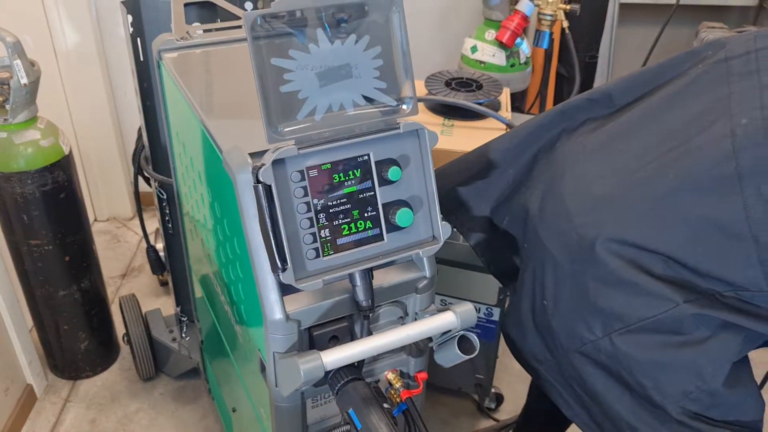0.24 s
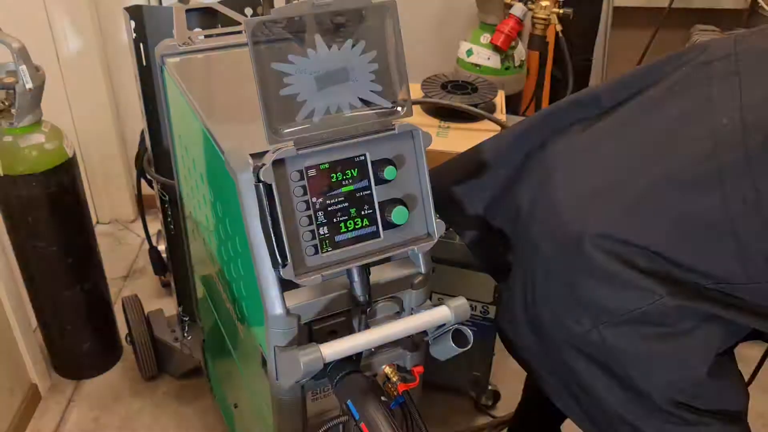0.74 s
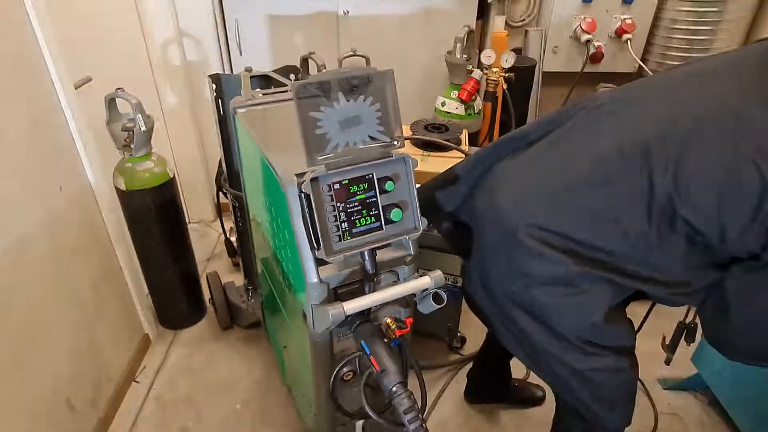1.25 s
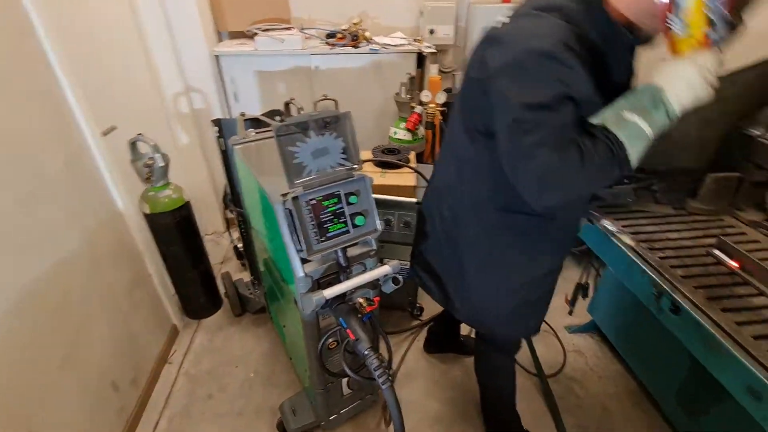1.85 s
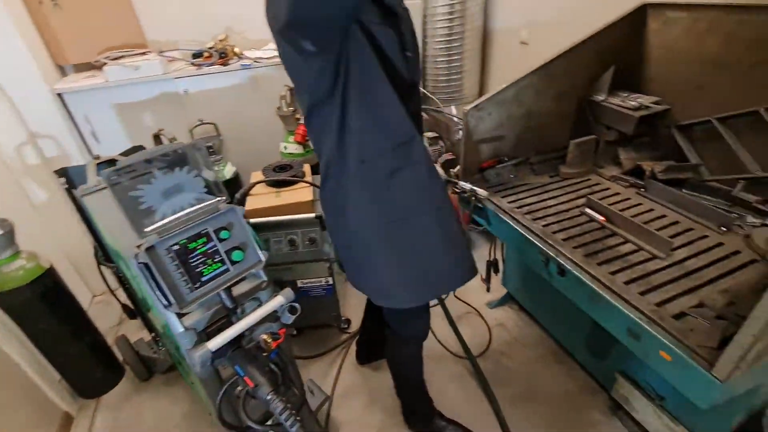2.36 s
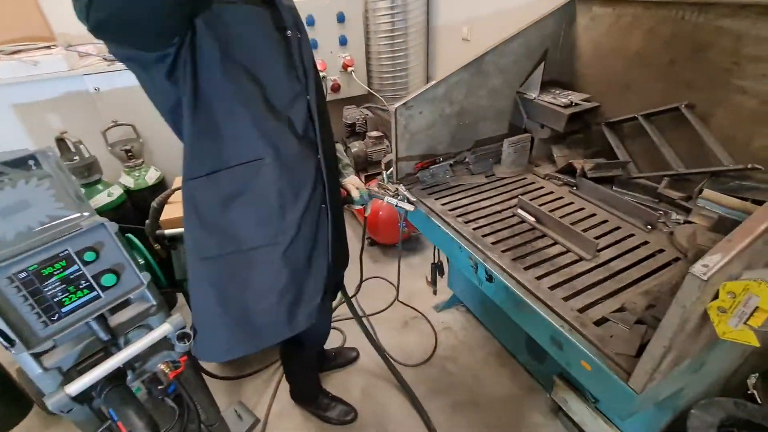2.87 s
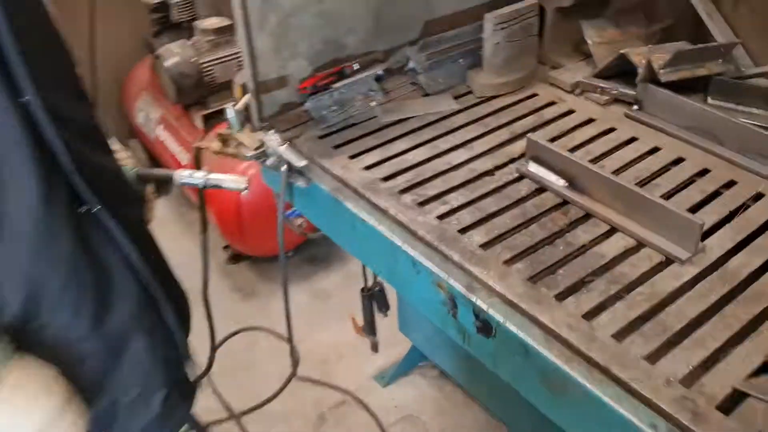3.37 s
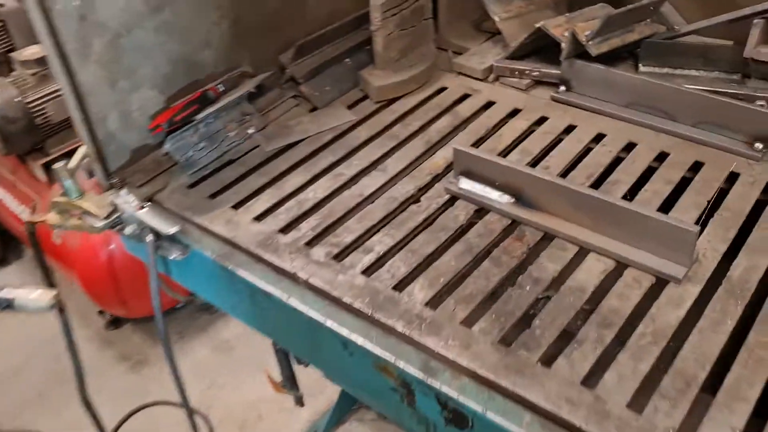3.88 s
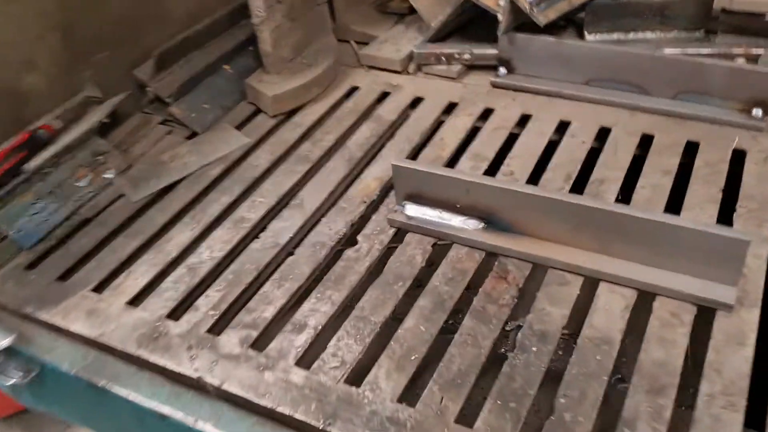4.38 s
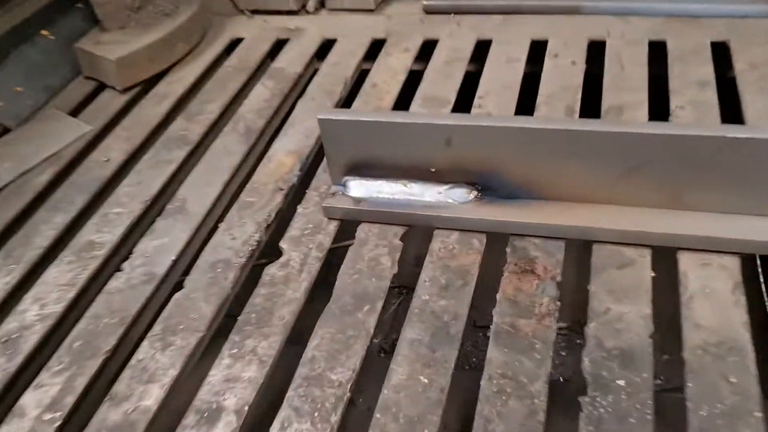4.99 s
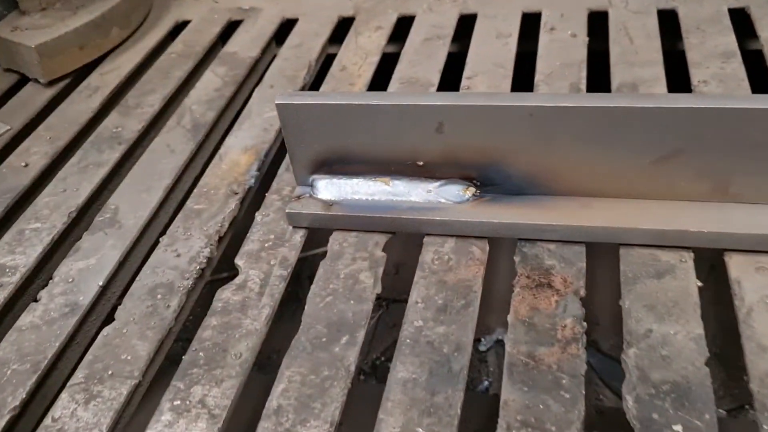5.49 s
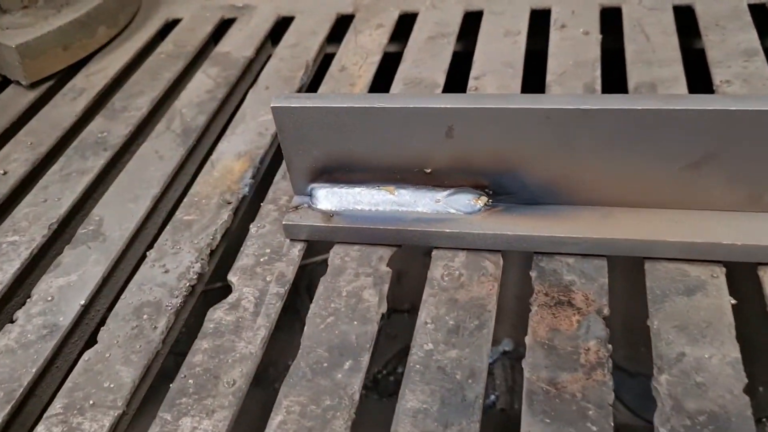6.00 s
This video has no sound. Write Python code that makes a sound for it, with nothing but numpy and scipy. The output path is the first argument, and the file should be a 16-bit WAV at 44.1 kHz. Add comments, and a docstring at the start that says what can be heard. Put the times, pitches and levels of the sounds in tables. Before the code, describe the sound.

Steady pitched welding buzz steps down and stops at once; shielding gas hisses on, then shuts off, over a faint pump whine and fan hum.

```python
"""Pulsed welding arc going out

A welding arc buzzes and sizzles in a workshop near a hand-held stereo microphone: current pulses make
pressure steps that slow down in stages and stop. Shielding gas hisses as jet noise until its valve shuts.
A cooling pump whines as modulated gear tones; fans and a low drone are shaped noise, small knocks are
resonant noise bursts, and cloth rustles in grainy noise strokes.
"""
import sys
import numpy as np
from scipy import signal
from scipy.fft import rfft, irfft, next_fast_len
from scipy.io import wavfile
from scipy.ndimage import uniform_filter1d, map_coordinates

SR = 44100
rng = np.random.default_rng(int(sys.argv[2]) if len(sys.argv) > 2 else 0)


def to_wav(sig):
    """Store sig (one row per channel, or 1-D mono) as 16-bit WAV at the path in sys.argv[1].

    Samples outside -1..1 are clipped; the rate is SR.
    """
    pcm = np.clip(np.atleast_2d(sig), -1, 1) * 32767
    pcm = np.round(pcm).astype(np.int16)
    wavfile.write(sys.argv[1], SR, pcm.T)  # frames by channels


N = 275184

# All levels in the tables are relative unless called a peak.
# strength of the current pulses: (time [s], level [dB])
ARC_PULSE_LEVEL = [(0, -0.5), (.42, -.5), (.48, 1), (.55, -1), (.67, -.5), (.7, -2)]
# pulse rate of the power source, lowered in steps: (start time [s], rate [pulses/s])
PULSE_RATE_STEPS = [(0, 244.85), (.456, 241), (.5155, 228.5), (.570, 179.5), (.623, 148.6), (.6665, 119.6)]
# the arc's way past bench and welder to each port: (frequency [Hz], left level [dB], right level [dB])
ARC_PATH = [(117, -29.5, -30), (151, -35.5, -31), (187, -43, -42), (225, -28, -28.5), (250, -28.5, -31.5),
            (306, -33, -29), (348, -31.5, -33.5), (452.8, -26, -24), (460.6, -42.5, -34.5), (620, -32, -35),
            (750, -37.5, -37.5), (892, -27.5, -22.5), (973, -22.5, -23.5), (1055, -17.5, -14.5),
            (1130, -44, -45), (1186, -15, -37), (1232, -41.5, -50), (1320, -42, -16.5), (1453, -19, -28),
            (1596, -47, -15.5), (1731, -18.5, -12), (1814, -28, -16), (2010, -46, -40),
            (2184, -30.5, -28.5), (2400, -38, -31), (2520, -33.5, -28.5), (2693, -41, -31),
            (2938, -40.5, -29.5), (3110, -24, -29), (3188, -57, -28), (3230, -30, -26.5),
            (3406, -35, -24.5), (3820, -40, -49), (3970, -29.5, -30), (4094, -22, -34), (4300, -61, -47),
            (4610, -31, -25.5), (4830, -27.5, -43), (5350, -50, -29.5), (5387, -28, -32), (5410, -39, -42),
            (6200, -38, -37.5), (6600, -40, -35), (7300, -45.5, -43.5), (8370, -32, -41), (9700, -50, -36),
            (11400, -48, -37.5), (13000, -45, -38), (15500, -50, -46)]
# left-port phase against the right for the arc, negative is late: (frequency [Hz], phase [rad])
LEFT_PHASE = [(0, 0), (690, -2), (1810, -3.5), (2670, -6), (3620, -8), (3880, -8.5), (4740, -10),
              (6370, -15.5), (7320, -11.5), (7840, -18.5), (8350, -11), (8610, -13.5), (10800, -17),
              (15700, -27.5)]
# spectrum of the plasma's sizzle: (frequency [Hz], left level [dB], right level [dB])
SIZZLE_SPECTRUM = [(100, -26, -24), (300, -42, -14), (706, -7, -27), (1240, -11, 2), (1620, -12, 6.5),
                   (2450, -2.5, -5.5), (4640, -6.5, -5), (6160, -10, -5), (7500, -14, -10.5),
                   (8600, -3, -2.5), (10100, -9, -1), (11600, -2.5, 4.5), (13400, -5.5, 2.5),
                   (15800, -8, -13)]
# spits of metal, before the path to the ports: (time [s], starting level [dB])
SPITS = [(0.2064, -10), (0.486, -10.5), (0.5104, -12.5), (0.5731, -23), (0.5844, -12.5), (0.607, -17),
         (0.6445, -16), (0.681, -8), (0.6976, -21)]
# gas flow: (time [s], hiss level [dB], how far the nozzle is clear of the work [0-1])
GAS_FLOW = [(0.85, -49.5, 0), (1.25, -50.5, 0), (1.65, -46, 0.4), (2.6, -42, 0.64), (3, -43.5, 0.49),
            (3.3, -42, 0.76), (4.3, -39.5, 0.71)]
# jet blowing on the work, behind the welder: (frequency [Hz], spectral density [dB/Hz])
SHADED_JET = [(590, -46), (1000, -45), (1180, -6), (1430, -8.5), (1960, 2), (2070, -6.5), (3300, -14.5),
              (4010, -22), (5820, -8.5), (14700, -18), (15900, -18)]
# jet blowing free: (frequency [Hz], spectral density [dB/Hz])
FREE_JET = [(590, -64), (1000, -39), (1050, -28), (1520, -13), (1830, -4), (2150, -12), (2650, -17),
            (3150, -13), (4610, -21), (6020, -10.5), (9140, -6.5), (11800, -17.5), (14900, -16.5),
            (15900, -19)]
# low drone: (frequency [Hz], spectral density [dB/Hz])
DRONE_SPECTRUM = [(12, -46), (20, -17.5), (67, -3), (86, 6), (104, 2), (124, -14.5), (178, -8.5),
                  (200, -22.5), (260, -64), (440, -120)]
# drone over time: (time [s], level [dB])
DRONE_COURSE = [(.85, -48), (3, -45.5), (3.9, -42.5), (4.2, -43.5), (5.4, -37.5), (5.72, -40),
                (5.83, -34.5), (6.03, -39.5), (6.18, -34.5), (6.24, -38)]
# fan noise: (frequency [Hz], spectral density [dB/Hz])
FAN_SPECTRUM = [(70, -37), (120, -6), (150, -12), (400, -11.5), (900, -17), (1700, -16.5), (2200, -23.5),
                (3300, -26), (4000, -30.5), (5000, -38.5), (7000, -37), (11500, -35.5), (16000, -37)]
# left-right likeness of the fan noise: (frequency [Hz], correlation [0-1])
FAN_LIKENESS = [(60, 0.79), (240, 1), (950, 0.54), (3770, 0.073), (15000, 0.02)]
# narrow hums among the fans: (frequency [Hz], level over the broad fan noise [dB], width [Hz])
FAN_HUMS = [(300.8, -13.5, 3), (395, -7, 47), (1208, -13, 20)]
# fans over time: (time [s], level [dB])
FAN_COURSE = [(.85, -46.5), (1.9, -44.5), (2.5, -43), (3.1, -46.5), (6.24, -45)]
# pump whine: (time [s], tooth tone level [dB], side tone level [dB])
WHINE_COURSE = [(.85, -62, -59.5), (1.7, -57.5, -60), (2.05, -46.5, -52.5), (2.5, -59, -57),
                (3.25, -55, -59), (3.5, -45, -74), (4.3, -49, -64), (5.1, -49, -63.5), (6.24, -50.5, -62.5)]
# overtones of the tooth tone: (multiple [1], level [dB])
TOOTH_OVERTONES = [(2, -12), (3, -13.5), (4, -15.5), (5, -17.5), (6, -13), (7, -45.5)]
# knocks: (time [s], body peak level [dB], body frequency [Hz], bright tick peak level [dB])
KNOCK_LIST = [(1.885, -31, 560, -50), (2.02, -33, 2300, -35), (2.317, -28.5, 1420, -50),
              (2.4, -35, 1520, -50), (2.44, -34, 590, -50), (2.655, -33, 1300, -43),
              (4.56, -44.5, 3300, -60), (5.337, -38, 2900, -42.5), (5.404, -41, 3380, -44),
              (5.885, -42, 2900, -57)]
# cloth strokes: (middle time [s], level [dB], length [s])
RUSTLE_STROKES = [(5.004, -63, .25), (5.3, -57.5, 0.37), (5.68, -54, 0.21), (5.896, -55.5, .14)]
# cloth noise: (frequency [Hz], spectral density [dB/Hz])
CLOTH_SPECTRUM = [(800, -20), (2000, -15), (3200, 0), (5000, -9.5), (9000, -12), (16000, -22)]
# reverberation of the workshop: (frequency [Hz], time to fall 60 dB [s])
ROOM_T60 = [(150, 0.9), (1000, 0.29), (3000, 0.31), (12000, 0.11)]

ARC_OUT, GAS_SHUT = .701, 4.328  # s
BURNT = SR // 5  # samples for which the arc has already been burning at the start
SIZZLE_DB, SIZZLE_FALL_DB = -17.5, 10.5  # at the full pulse rate; lost if the rate fell to nothing
SCATTER, SCATTER_GROWS = 0.2, 1.7  # timing scatter [samples] at the full rate; added if it fell to nothing
TOOTH_HZ, SHAFT_HZ = 1886, 47.5
KNOCK_WIDTH_HZ, KNOCK_T60 = 550, 0.13  # T60 [s] for bodies up to 1 kHz, shorter for higher ones
TICK_HZ, TICK_WIDTH_HZ, TICK_T60 = 4470, 7700, 0.084  # T60 [s]
TOP_HZ = 15790


def amp(db):
    """Logarithmic level: decibels to gain."""
    return 10 ** (np.asarray(db) / 20)


def unit(x):
    """Power normalisation: x scaled to rms 1."""
    return x / np.sqrt(np.mean(x ** 2) + 1e-20)


def along(points, hz):
    """Logarithmic frequency scale: the columns of (Hz, value, ..) points read at hz."""
    f, *columns = np.transpose(points)
    return np.array([np.interp(np.log(hz + 1), np.log(f + 1), c) for c in columns])


def curves(rows):
    """Linear interpolation: one value per sample for each column after the time."""
    times, *columns = np.transpose(rows)
    return [np.interp(np.arange(N) / SR, times, c) for c in columns]


def wobble(rate):
    """Band-limited fluctuation: a smooth random curve with rate knots a second."""
    knots = rng.standard_normal(int(N * rate / SR) + 4)
    return map_coordinates(knots, [np.arange(N) * rate / SR])


def filtered(x, response):
    """Linear filtering: the spectrum of x times a complex response of frequency."""
    m = next_fast_len(N + SR // 2)
    return irfft(rfft(x, m) * response(np.fft.rfftfreq(m, 1 / SR)), m)[..., :N]


def rush(spectrum, alike, patchy_db):
    """Partly coherent turbulence: stereo noise of rms 1 with time-frequency patches of random gain."""
    z = signal.stft(rng.standard_normal((2, N)), nperseg=512)[2]
    patches = uniform_filter1d(rng.standard_normal(z.shape[1:]), size=6, axis=0)
    patches = uniform_filter1d(patches, size=12, axis=1)
    pair = signal.istft(z * amp(patchy_db * unit(patches)), nperseg=512)[1][:, :N]

    def mid_side_response(hz):
        # the share of mid against side sets how alike the two ports are
        turn = np.arccos(np.clip(along(alike, hz)[0], -1, 1)) / 2
        return amp(along(spectrum, hz)) * [np.cos(turn), np.sin(turn)]

    mid, side = filtered(pair, mid_side_response)
    return unit(np.array([mid + side, mid - side]))


def ports(points, spread):
    """Minimum phase and dispersion: near reflections delay each band by up to spread [s], blunting a step."""
    def response(hz):
        db = along(points, hz)
        cepstrum = irfft(np.log(amp(db.mean(axis=0))))
        cepstrum[len(hz):] = 0  # the causal half gives the minimum phase, shared by both ports
        delay = spread * np.interp(hz, np.linspace(0, SR / 2, 64), rng.uniform(0, 1, 64))
        phase = 2 * rfft(cepstrum).imag - 2 * np.pi * np.cumsum(delay) * hz[1]
        left_only = np.interp(hz, *np.transpose(LEFT_PHASE)) * [[1], [0]]
        return amp(db) * np.exp(1j * phase + 1j * left_only)
    return response


def room(x, channels):
    """Reverberation: each frequency decays at its own speed; one tail for both ports, or one each."""
    hz, t, z = signal.stft(rng.standard_normal((channels, SR // 2)), SR, nperseg=256)
    decay = amp(-60 * t / along(ROOM_T60, hz)[0][:, None])
    tail = signal.istft(z * decay, SR, nperseg=256)[1]
    late = np.pad(x, ((0, 0), (300, 0)))  # the tail sets in 300 samples late
    return signal.fftconvolve(late, tail / np.linalg.norm(tail[0]), axes=1)[:, :N]


def pulse_train(at, size_db):
    """Band-limited impulses: a windowed sinc at each fractional sample time."""
    taps = at.astype(int)[:, None] + np.arange(-12, 13)
    offset = taps - at[:, None]
    kernel = np.sinc(offset) * np.cos(offset * np.pi / 26) ** 2
    return np.bincount(taps.ravel(), (kernel * amp(size_db)[:, None]).ravel(), N)


def spatter():
    """Size and brightness: tiny spits are brighter than sizzle, as the slope of decaying noise bursts."""
    t, envelope = np.arange(SR // 50) / SR, np.zeros(N)
    for start, db in SPITS:
        envelope[BURNT + round(start * SR):][:len(t)] += amp(db - 60 * t / 0.011)
    return np.gradient(envelope * rng.standard_normal(N))


def arc():
    """Thermal expansion: each current pulse blows the plasma up, a sharp pressure step and a flare of sizzle."""
    def after_lead_in(x):
        return np.r_[np.full(BURNT, x[0]), x[:-BURNT]]

    pulse_db = after_lead_in(curves(ARC_PULSE_LEVEL)[0])
    starts, rates = np.transpose(PULSE_RATE_STEPS)
    step = np.searchsorted(starts, np.arange(N) / SR, 'right') - 1
    rate = after_lead_in(rates[step])
    slowed = 1 - rate / rates[0]  # a slower arc is less steady and sizzles less
    scatter = SCATTER + SCATTER_GROWS * slowed
    burning = np.arange(N) < ARC_OUT * SR + BURNT

    cycles = np.cumsum(rate) / SR
    at = np.interp(np.arange(1, cycles[burning][-1]), cycles, np.arange(N))
    chance = rng.standard_normal((len(at), 3))  # timing, strength, flare
    at = at + scatter[at.astype(int)] * chance[:, 0]
    # an unsteady arc also varies in strength
    size_db = (0.33 + 1.1 * scatter[at.astype(int)]) * chance[:, 1]
    steps = SR / (2 * rates[0]) * amp(pulse_db) * pulse_train(at, size_db)
    buzz = filtered(steps, ports([(22, -90, -92)] + ARC_PATH, spread=.0018))

    # the sizzle flares after every pulse, each flare at its own strength, and never quite dies between
    pulse_index = np.clip(cycles.astype(int) - 1, 0, len(at) - 1)
    flare = amp(2.9 * chance[pulse_index, 2]) * np.exp(-2.5 * (cycles % 1))
    sizzle = amp(SIZZLE_DB - SIZZLE_FALL_DB * slowed) * (0.38 + flare) * burning
    crackle = sizzle * rng.standard_normal(N) + spatter()
    hiss = filtered(crackle, ports(SIZZLE_SPECTRUM, spread=0.00102))

    buzz_tail = amp(-10.5) * room(buzz, channels=1)
    hiss_tail = amp(-2.5) * room(hiss, channels=2)
    heard = buzz + hiss + buzz_tail + hiss_tail
    return np.pad(heard[:, BURNT:], ((0, 0), (0, BURNT)))


def gas():
    """Jet noise: the nozzle hisses until the valve shuts, brighter as it is lifted clear; the room lets it die."""
    hiss_db, clear = curves(GAS_FLOW)
    turn = np.clip(clear, 0, 1) * np.pi / 2  # equal-power blend of the two jets
    shaded = np.cos(turn) * amp(0.5) * rush(SHADED_JET, [(1000, 0.036)], patchy_db=3.5)
    free = np.sin(turn) * rush(FREE_JET, [(1000, 0.083)], patchy_db=2.5)
    flowing = np.arange(N) < GAS_SHUT * SR
    jet = amp(hiss_db + 0.28 * wobble(5.4)) * flowing * (shaded + free) * amp([[-1.2], [1.2]])
    return jet + amp(-2) * room(jet, channels=2)


def drone():
    """Low-frequency coherence: a lumpy low noise, nearly alike at both ports."""
    level = amp(curves(DRONE_COURSE)[0] + 2.0 * wobble(6.3))
    return level * rush(DRONE_SPECTRUM, [(60, 0.98)], patchy_db=0.06) * amp([[-.9], [.9]])


def fans():
    """Broadband flow noise with narrow hums: the power source's fans, less alike at the ports up the scale."""
    noise = rush(FAN_SPECTRUM, FAN_LIKENESS, patchy_db=1.62) * amp([[-.7], [.7]])
    for hz, db, width in FAN_HUMS:
        band = [(1, -120), (hz - 3 * width, -40), (hz - width / 2, -3), (hz, 0),
                (hz + width / 2, -3), (hz + 3 * width, -40), (SR, -120)]
        noise = noise + amp(db) * rush(band, FAN_LIKENESS, patchy_db=1.5)
    # the fans stand nearer the left port, which hears them 8 samples early
    return amp(curves(FAN_COURSE)[0]) * np.array([np.roll(noise[0], -8), noise[1]])


def pump():
    """Frequency modulation: a shaft uneven once a turn puts side tones round every overtone of the gear teeth."""
    tone_db, side_db = curves(WHINE_COURSE)
    t = np.arange(N) / SR
    tooth = 2 * np.pi * TOOTH_HZ * t + 0.59 * np.cumsum(wobble(6)) * 6 / SR
    shaft = 2 * np.pi * SHAFT_HZ * t
    # a little louder while the shaft runs fast, so the upper side tones win
    throb = 1 + .2 * np.cos(shaft + 1.5)
    out = []
    # standing waves make each tone swell and drift differently at the two ports
    for port_db, drift in ((-8.0, 1.66), (6.0, 0.066)):
        tone = amp(tone_db + 1.2 * wobble(8)) * np.sin(tooth + drift * wobble(1.51))
        sides = np.zeros(N)
        for k, db in [(-2, -0.5), (-1, -16), (1, 4), (2.2, -9)]:  # (shaft multiple, dB)
            sides += amp(db + 1.9 * wobble(4.93)) * np.sin(tooth + k * shaft + 1.8 * wobble(2.64))
        uneven = tooth + 0.33 * np.sin(shaft + 1.7) + 0.29 * wobble(36)
        overtones = np.zeros(N)
        for k, db in TOOTH_OVERTONES:
            phase = k * uneven + 0.47 * drift * wobble(1.45)
            overtones += amp(db + 0.91 * wobble(3.94)) * np.sin(phase)
        out.append(amp(port_db) * (tone + amp(side_db) * sides) + amp(-51.5) * throb * overtones)
    return np.array(out)


def struck(hz, width, t60):
    """Resonance: a short stereo noise burst rings in one broad peak, scaled to peak 1."""
    t = np.arange(SR // 5) / SR
    mid, side = rng.standard_normal((2, len(t))) * [[1], [.6]]
    envelope = amp(-60 * t / t60) * (1 - np.exp(-t / 0.0021))
    burst = np.array([mid + side, mid - side]) * envelope
    peak = signal.iirpeak(hz, hz / width, SR)
    ring = signal.lfilter(*peak, signal.lfilter(*peak, burst))
    return ring / np.abs(ring).max()


def knocks():
    """Impact excitation: each knock is a resonant body and a bright tick."""
    out = np.zeros((2, N + SR))
    for start, body_db, body_hz, tick_db in KNOCK_LIST:
        body_t60 = KNOCK_T60 * np.sqrt(1000 / max(body_hz, 1000))
        body = amp(body_db) * struck(body_hz, KNOCK_WIDTH_HZ, body_t60)
        tick = amp(tick_db) * struck(TICK_HZ, TICK_WIDTH_HZ, TICK_T60)
        first = round(start * SR)
        out[:, first:first + body.shape[1]] += body + tick
    return out[:, :N]


def rustle():
    """Friction noise: cloth rustles in uneven grains under smooth strokes."""
    t, strokes = np.arange(N) / SR, np.zeros(N)
    for middle, db, length in RUSTLE_STROKES:
        strokes += amp(db) * np.exp(-(2 * (t - middle) / length) ** 2)
    grains = amp(2.3 * wobble(60))
    return strokes * grains * rush(CLOTH_SPECTRUM, [(1000, 0.092)], patchy_db=2.0)


def scene():
    """Superposition: the pressures of all sources in the workshop add."""
    return arc() + gas() + drone() + fans() + pump() + knocks() + rustle()


def record(dry):
    """Band limitation: the microphone passes almost nothing above its upper limit."""
    return filtered(dry, lambda hz: 1 / (1 + (hz / TOP_HZ) ** 600))


dry = scene()
out = record(dry)
to_wav(out)
```